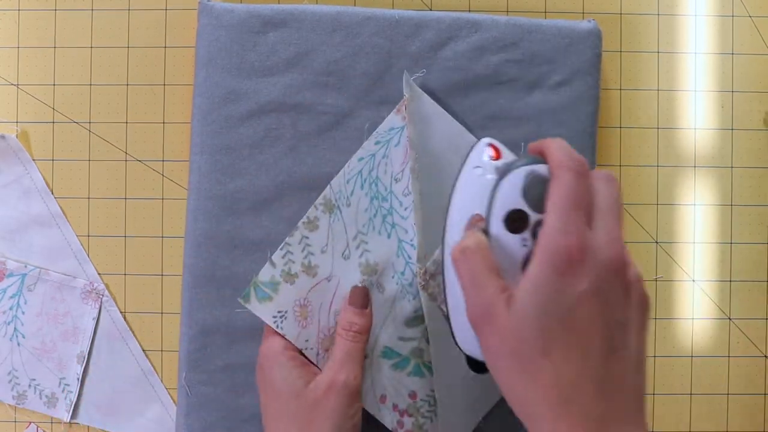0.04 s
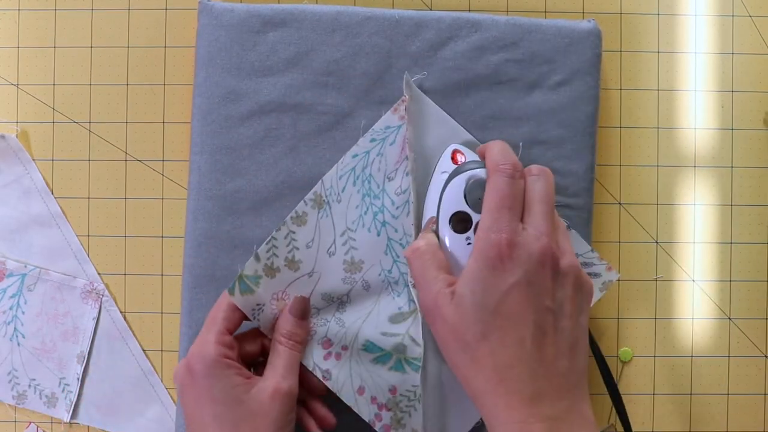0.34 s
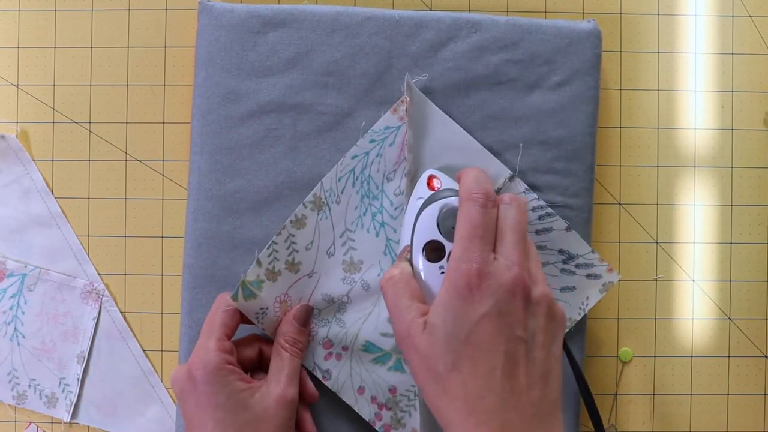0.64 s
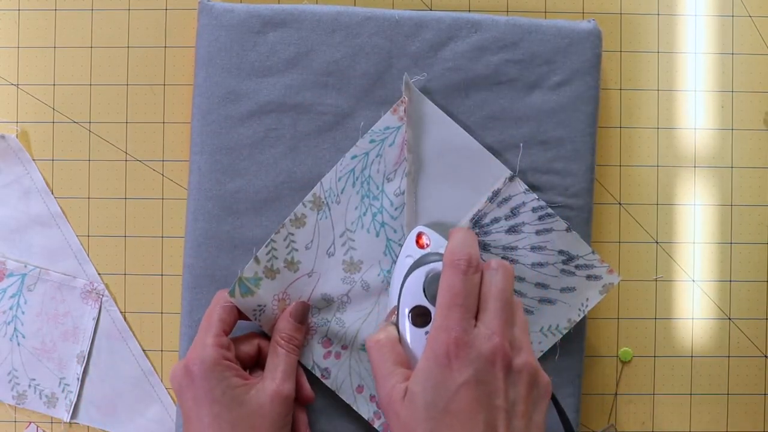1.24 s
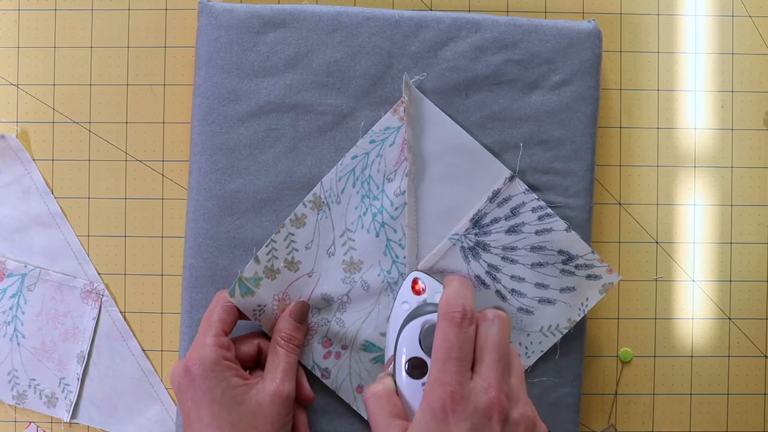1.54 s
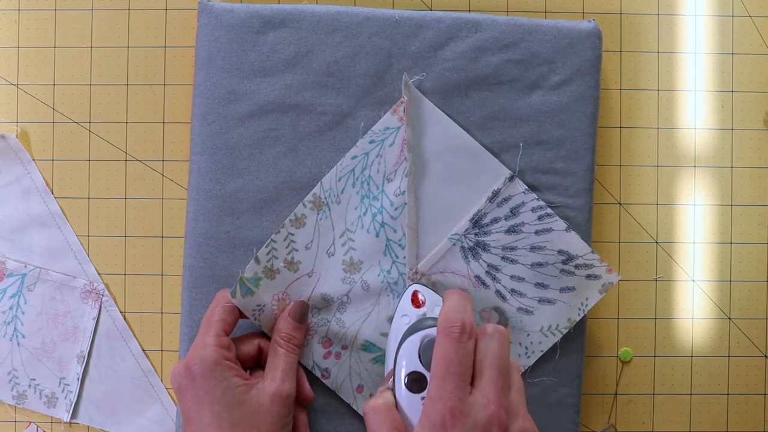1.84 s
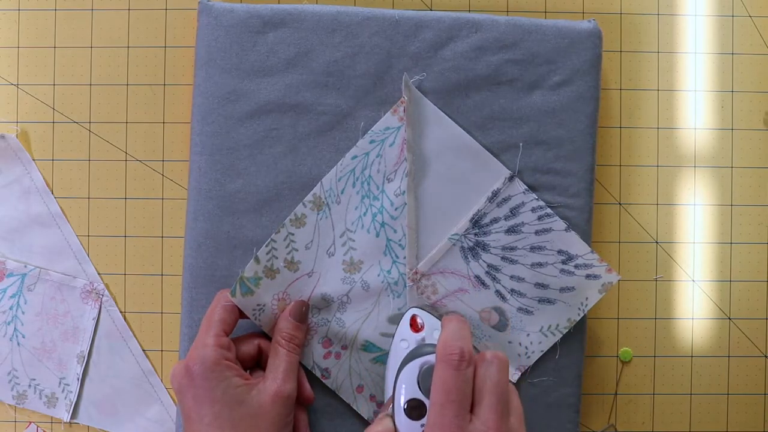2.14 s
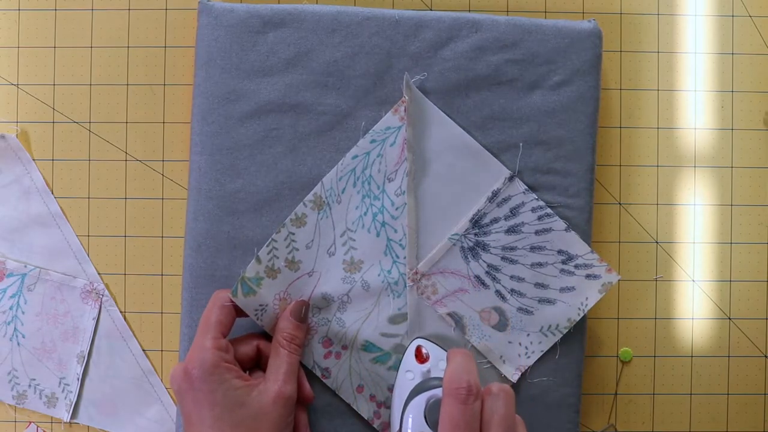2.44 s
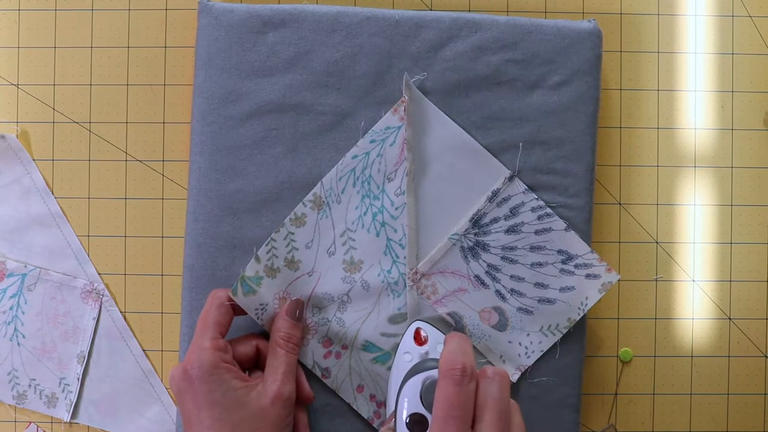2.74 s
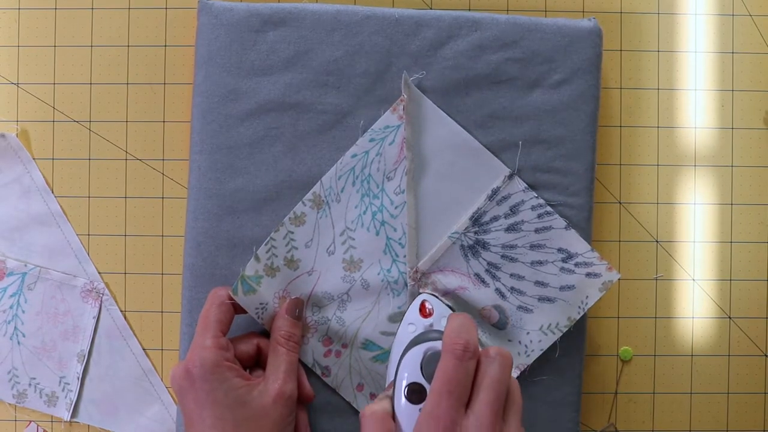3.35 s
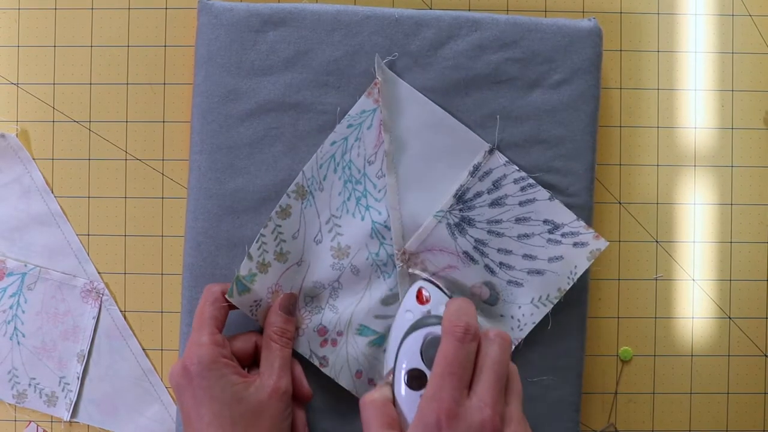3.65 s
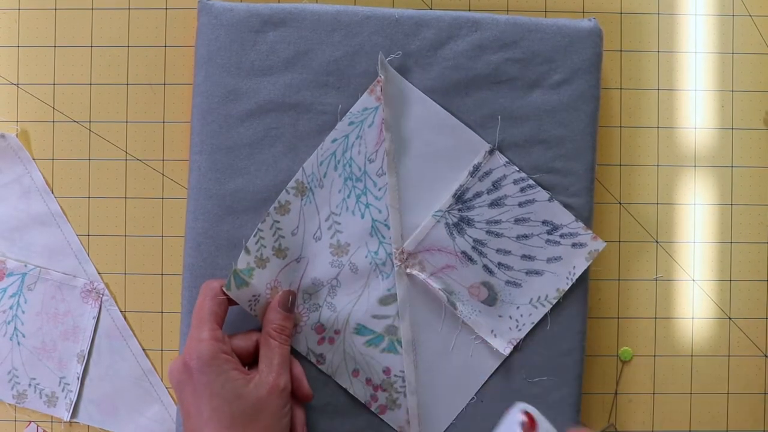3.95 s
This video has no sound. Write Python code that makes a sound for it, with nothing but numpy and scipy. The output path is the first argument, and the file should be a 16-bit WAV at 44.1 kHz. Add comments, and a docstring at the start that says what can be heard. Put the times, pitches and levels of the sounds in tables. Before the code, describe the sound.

A small iron swishes over cotton, close up in a quiet room, starting with a light scrape and a soft table bump. It judders with a low thrum around 1.3 seconds, and the thermostat clicks at 1.6. Fainter strokes follow, with a hollow knock at 2.5. At 3.4 the iron knocks down and sweeps across the cloth, then ticks, judders and knocks again just before 4 seconds.

```python
"""Ironing in a small room

Close on a padded board, a stereo pair of microphones, quiet air behind. A small iron glides to and fro
over cotton: its sole swishes on the weave, and where it catches and judders the board and the hollow
iron thrum. The thermostat clicks once, a little to the right. Near the end the iron knocks down,
sweeps across the seam and is dragged off."""
import sys
import numpy as np
from scipy import signal
from scipy.fft import rfft, irfft, next_fast_len
from scipy.io import wavfile
from scipy.ndimage import uniform_filter1d, map_coordinates

SR = 44100
rng = np.random.default_rng(int(sys.argv[2]) if len(sys.argv) > 2 else 0)


def pcm_store(signal):
    """Save signal as 16-bit PCM."""
    levels = np.round(np.clip(np.atleast_2d(signal), -1, 1) * 32767)
    wavfile.write(sys.argv[1], SR, levels.astype(np.int16).T)


N = 176400

# decay of the small room: f/Hz, t60/s
ROOM_DECAY = [(150, 0.41), (1000, 0.33), (4000, 0.26), (12000, 0.31)]
BOARD_WET_DB, SHELL_WET_DB, METAL_WET_DB, SNAP_WET_DB = -19, -1, 1.5, -13
# spectrum of the room's air: f/Hz, level/dB
AIR_SPECTRUM = [(25, -11), (60, -6.5), (110, -10), (250, -3.5), (400, -6), (700, -12.5), (1050, -11.5),
                (2000, -15), (3200, -15), (6000, -19.5), (10000, -23.5), (15800, -31)]
AIR_DB, HUM_DB, HUM_HZ, HUM_WIDTH_HZ = -54, -60, 146.6, 34
# how alike air, rubbing cloth and sole plate arrive at the two microphones: f/Hz, correlation
AIR_ALIKE = [(50, 0.18), (160, 0.78), (500, 0.27), (1500, 0.065), (8000, 0.033)]
RUB_ALIKE = [(500, 0.32), (2500, 0.75), (5000, 0.47), (12000, 0.22)]
PLATE_ALIKE = [(500, 0.85), (2500, 0.11)]
# balance of the microphones: f/Hz, left minus right/dB
MIC_BALANCE = [(100, 0.5), (300, 1.6), (1200, 1.5), (2700, -2), (5000, 0.5), (12000, -.3)]
TOP_HZ = 15800

# hand on the table, thermostat and its bounces, grip on the housing, sole landing: t/s, level/dB
BUMPS = [(.233, -37.5), (.268, -50)]
SNAPS = [(1.6349, -27.5), (1.6367, -31), (1.6412, -31.5), (1.6467, -32.5)]
TICKS = [(.4735, -40), (3.6612, -28)]
LANDINGS = [(3.3945, -37.5)]
# the modes that each of these rings: f/Hz, level/dB, t60/s
TABLE_MODES = [(45, -11, 0.99), (92, -2, 0.12), (134, -1, 0.34), (158, 7, 0.074)]
SPRING_MODES = [(758, -22, 0.13), (1377, -10.5, 0.023), (1605, -19, 0.033), (2300, -10.5, 0.03),
                (2810, -2, 0.021), (2980, -5, 0.015), (3387, -2.5, 0.038), (3550, -7.5, 0.056),
                (4460, -21, 0.035), (6360, -21.5, 0.034)]
HOUSING_MODES = [(1090, -7, 0.029), (1400, -12.5, 0.028), (1850, -1.5, 0.0089), (2590, -9, 0.012),
                 (3330, -3, 0.0073), (3720, -6, 0.0085), (6200, -13, 0.0058), (8100, -17, 0.0078)]
SOLE_MODES = [(1439, -2.5, 0.092), (2140, -1.5, 0.053), (2280, 3, 0.034), (5270, -17, .04),
              (7940, -6, 0.035), (989, -3, .24), (1023, 1, .27), ]
SOFT_ATTACK_S, HARD_ATTACK_S = 0.0026, 0.00036

# resonances of the board and of the iron's hollow shell, sole plate and rim: f/Hz, width/Hz, level/dB
BOARD_PEAKS = [(138.5, 8, -1), (159.4, 15.4, 2.5), (181.6, 4, -1), (216, 13, -1), (263, 11, 10),
               (310, 18, -1), (377, 30, -11), (460, 31, -7.5), (586, 24, -16)]
SHELL_PEAKS = [(560, 520, -3), (731, 37, 5.5), (799, 54, 5.5), (909, 42, 10), (942, 40, 8),
               (1183, 340, 0.5), (1410, 42, 2), (1480, 40, 2.5), (1886, 300, -4.5), (2250, 210, -7.5)]
PLATE_PEAKS = [(459, 14, -1), (753, 20, -4), (850, 8.9, 3), (967, 58, 0), (1316, 130, -6.5),
               (1770, 140, -5.5), (2026, 88, -5.5), (2480, 960, -13)]
RIM_PEAKS = [(5240, 260, -2), (7900, 160, 10), (8800, 230, 6), (11000, 200, -18)]
# the iron knocks: t/s, board level/dB, shell level/dB, crack level/dB
KNOCKS = [(2.4859, -29, -31, -51), (3.393, -65, -58, -37.5), (3.3945, -28, -29, -31),
          (3.554, -49, -33.5, -39), (3.8303, -25.5, -36, -66), (3.8503, -31, -30.5, -42),
          (3.916, -38.5, -46, -51)]
# spectrum of the plastic crack: f/Hz, level/dB
CRACK_SPECTRUM = [(300, -30.5), (1200, -25), (2100, 14.5), (3300, 2), (5000, -2), (7600, -0.5), (11000, -9),
                  (16000, -23)]
CRACK_T60_S = 0.013

# threads snag under the sole: t/s, rise/s, fall/s, level/dB, f/Hz
SNAGS = [(.055, 0.012, 0.053, -52, 4120), (.28, 0.013, .012, -51, 3220)]
THREADS_PER_S, THREAD_WIDTH_HZ = 450, 770
# the sole scrapes as it first slides; the tipped iron skids on its rim:
# t/s, rise/s, hold/s, fall/s, level/dB
SCRAPES = [(-.05, 0.043, 0.1, 0.17, -44), (0.123, 0.11, 0.082, 0.24, -52),
           (0.466, 0.0077, 0.005, 0.016, -51.5)]
SKIDS = [(3.842, 0.012, .004, .014, -58), (3.888, 0.0078, 0.012, .012, -52.5)]
# the sole catches: t/s, rise/s, hold/s, fall/s, level/dB, rattle over thrum/dB, tilt/(dB per octave)
JUDDERS = [(1.292, 0.084, 0.0069, 0.051, -39, -11.5, 0), (1.381, 0.031, 0.01, 0.12, -52.5, -3, 8),
           (1.628, 0.092, 0.019, 0.05, -53, -9.5, 5), (1.986, 0.012, .005, 0.082, -48.5, -10, 2),
           (2.287, 0.056, .01, 0.075, -57.5, -2, -2), (2.414, 0.044, 0.028, 0.031, -45.5, -11, 2),
           (2.47, 0.029, 0.0086, 0.068, -40, -11, -4), (2.526, 0.047, .02, 0.068, -56.5, -7, -2),
           (3.386, 0.018, 0.038, 0.082, -42, -7, 5), (3.473, 0.018, 0.083, 0.051, -47.5, -6.5, 1.5),
           (3.661, 0.0025, 0.0098, 0.11, -56.5, 3.5, -4), (3.784, 0.068, 0.011, 0.028, -37.5, -5.5, 5),
           (3.877, 0.017, 0.016, 0.04, -38, -7, -1), (3.928, 0.015, 0.011, 0.047, -60.5, 8, 3)]
SLIPS_PER_S, SLIP_NOISE_DB = 330, -3

# strokes over the cotton: t/s, rise/s, hold/s, fall/s, level/dB, sag/(dB per s), tilt/(dB per octave),
# sole resonance over swish/dB, sole resonance f/Hz
STROKES = [(-.1, 0.07, 0.06, 0.35, -45.5, 37, -2.8, -9, 2310),
           (0.164, 0.071, 0.061, 0.027, -53, 15.5, 1, -7, 2850),
           (0.31, 0.019, 0.048, 0.04, -55, -4, 4, -2.5, 2760),
           (0.435, 0.065, 0.046, 0.14, -51, 2, 1.5, -7.5, 3000),
           (0.455, 0.089, 0.21, 0.13, -52, 9, 0.4, -2.5, 2500),
           (0.84, 0.27, .24, 0.48, -52, -2, 0, -7, 2420),
           (1.403, 0.15, 0.2, 0.14, -57.5, 8, -3, -2.5, 3000),
           (1.933, 0.12, 0.4, 0.21, -56.5, 0, 0, 0, 3170),
           (2.583, 0.096, 0.065, 0.047, -55, -9, 2, -3.5, 2820),
           (2.812, 0.049, 0.047, 0.032, -55.5, 0, 0.5, -2, 3200),
           (2.952, 0.092, 0.25, 0.15, -54.5, 16, 0.5, -3.5, 3220),
           (3.388, 0.014, 0.056, 0.093, -54.5, 4, 5, 1, 3180),
           (3.431, 0.087, 0.039, 0.088, -43, -8, 1, -4, 3060),
           (3.622, 0.035, 0.023, 0.47, -52.5, 24, 0.5, -18, 3200),
           (3.806, 0.044, 0.011, 0.03, -51, 0, 2.5, -6, 2980),
           (3.873, 0.015, 0.012, 0.062, -51.5, 0, 6, -7, 3180)]
# spectrum of the rubbed weave: f/Hz, level/dB
WEAVE_SPECTRUM = [(300, -28), (600, -7.5), (950, -9), (1250, -4.5), (1500, -9), (2000, -7), (3300, -6),
                  (4800, -8.5), (6200, -10), (7500, -12.5), (11000, -19), (15800, -29.5)]
FIBRES_PER_S, FIBRE_DB = 1200, -6.5
FLUTTER_PER_S, FLUTTER_DB = 55, 1
TILT_PIVOT_HZ, SOLE_WIDTH_HZ = 3500, 480


def amp(db):
    """Decibels to gain."""
    return 10 ** (np.asarray(db) / 20)


def unit(x):
    """Scale to rms 1."""
    return x / np.sqrt(np.mean(x ** 2) + 1e-20)


def steady(x, window_s=.04):
    """The same vibration held at a running rms of 1."""
    power = uniform_filter1d(x ** 2, size=round(window_s * SR))
    return x / np.sqrt(np.abs(power) + 1e-20)


def along(points, hz):
    """(f/Hz, value) points read on a log axis."""
    f, v = np.transpose(points)
    return np.interp(np.log(hz + 1), np.log(f + 1), v)


def wobble(rate):
    """A smooth random curve, rate knots a second."""
    knots = rng.standard_normal(int(N * rate / SR) + 4)
    return map_coordinates(knots, [np.arange(N) * rate / SR])


def impulses(rate):
    """Random impulses of either sign, on average rate a second."""
    return (rng.random(N) < rate / SR) * rng.choice([-1, 1], N)


def filtered(x, response):
    """x through a complex frequency response."""
    n = x.shape[-1]
    padded = next_fast_len(n + SR // 4)
    return irfft(rfft(x, padded) * response(np.fft.rfftfreq(padded, 1 / SR)), padded)[..., :n]


def resonate(x, peaks):
    """x through parallel (f/Hz, width/Hz, level/dB) resonances of alternating sign."""
    def response(f):
        return sum((-1) ** k * amp(db) * 1j * f * width / (hz * hz - f * f + 1j * f * width)
                   for k, (hz, width, db) in enumerate(peaks))
    return filtered(x, response)


def spread(pair, alike):
    """Two unrelated signals mixed to left and right with the given correlation."""
    turn = lambda hz: np.arccos(np.clip(along(alike, hz), -1, 1)) / 2
    mid, side = filtered(pair, lambda hz: np.array([np.cos(turn(hz)), np.sin(turn(hz))]))
    return np.array([mid + side, mid - side])


def noise(alike):
    """White stereo noise with the given correlation."""
    return spread(rng.standard_normal((2, N)), alike)


def swell(start, rise, hold, fall):
    """A rounded rise, hold and fall."""
    corners = start + np.cumsum(np.abs([0, rise, hold, fall]))
    ramp = np.interp(np.arange(N) / SR, corners, [0, 1, 1, 0])
    return np.sin(ramp * np.pi / 2) ** 2


def since(start):
    """Seconds since start, zero before."""
    return np.maximum(np.arange(N) / SR - start, 0)


def struck(hits, modes, attack):
    """Each hit rings the decaying modes in a slightly different mix."""
    out, t = np.zeros(N + SR), np.arange(SR // 2) / SR
    for start, db in hits:
        ring = sum(amp(level + rng.normal(0, 1) - 60 * t / t60) * np.sin(2 * np.pi * hz * t)
                   for hz, level, t60 in modes)
        out[round(start * SR):][:len(t)] += amp(db) * ring * (1 - np.exp(-t / attack))
    return out[:N]


def in_room(x, wet_db):
    """A close mono sound plus the room's short answer at each microphone."""
    hz, t, spectra = signal.stft(rng.standard_normal((2, SR // 3)), SR, nperseg=256)
    decay = amp(-60 * t / along(ROOM_DECAY, hz)[:, None])
    tail = signal.istft(spectra * decay, SR, nperseg=256)[1]
    tail = np.pad(tail / np.linalg.norm(tail[0]), ((0, 0), (SR // 250, 0)))  # arrives 4 ms late
    return x + amp(wet_db) * signal.fftconvolve(x[None], tail, axes=1)[:, :N]


def room_tone():
    """Steady air all around the microphones, with a low drone."""
    air = filtered(noise(AIR_ALIKE), lambda hz: amp(along(AIR_SPECTRUM, hz)))
    hum = resonate(noise(AIR_ALIKE), [(HUM_HZ, HUM_WIDTH_HZ, 0)])
    return amp(AIR_DB) * unit(air) + amp(HUM_DB) * unit(hum)


def table_bump():
    """The hand bumps the table and stirs its low modes."""
    return in_room(struck(BUMPS, TABLE_MODES, SOFT_ATTACK_S), BOARD_WET_DB)


def housing_ticks():
    """The plastic housing ticks under the grip."""
    return in_room(struck(TICKS, HOUSING_MODES, HARD_ATTACK_S), SHELL_WET_DB)


def thermostat():
    """The thermostat's spring snaps and bounces, a little right of centre."""
    click = in_room(struck(SNAPS, SPRING_MODES, HARD_ATTACK_S), SNAP_WET_DB)
    return click * amp([[-1], [1]])


def sole_landing():
    """The metal of the sole rings as it lands."""
    return in_room(struck(LANDINGS, SOLE_MODES, HARD_ATTACK_S), METAL_WET_DB)


def knocking():
    """Each blow rings board and shell, with a short plastic crack."""
    from_board, from_iron = np.zeros(N), np.zeros(N)
    crack = unit(filtered(rng.standard_normal(N), lambda hz: amp(along(CRACK_SPECTRUM, hz))))
    blow = signal.unit_impulse(SR // 2)
    board, shell = resonate(blow, BOARD_PEAKS), resonate(blow, SHELL_PEAKS)
    for start, board_db, shell_db, crack_db in KNOCKS:
        place = lambda ring: np.pad(ring / np.abs(ring).max(), (round(start * SR), N))[:N]
        t = since(start)
        crack_gain = amp(crack_db - 60 * t / CRACK_T60_S) * (t > 0)
        from_board += amp(board_db) * place(board)
        from_iron += amp(shell_db) * place(shell) + crack_gain * crack
    return in_room(from_board, BOARD_WET_DB) + in_room(from_iron, SHELL_WET_DB)


def snagging():
    """Threads catch on the sole and flick free in a short scratchy run."""
    out = np.zeros(N)
    for start, rise, fall, db, hz in SNAGS:
        scratch = resonate(impulses(THREADS_PER_S), [(hz, THREAD_WIDTH_HZ, 0)])
        out += amp(db) * swell(start, rise, 0, fall) * unit(scratch)
    return in_room(out, SHELL_WET_DB)


def scraping():
    """Friction rings the modes of the sole plate, and the high ones of its rim when it skids."""
    drag = lambda rows: sum(amp(db) * swell(*timing) for *timing, db in rows)
    plate = unit(resonate(noise(PLATE_ALIKE), PLATE_PEAKS))
    rim = unit(resonate(noise(PLATE_ALIKE), RIM_PEAKS))
    return drag(SCRAPES) * plate + drag(SKIDS) * rim


def juddering():
    """Irregular slips shake board and shell; where the sole bears down sets the thrum's colour."""
    force = unit(impulses(SLIPS_PER_S)) + amp(SLIP_NOISE_DB) * rng.standard_normal(N)
    board = resonate(force, BOARD_PEAKS)
    octaves = lambda hz: np.log2(np.clip(hz, BOARD_PEAKS[0][0], BOARD_PEAKS[-1][0]))
    thrum, rattle_gain = np.zeros(N), np.zeros(N)
    for *timing, db, rattle_db, tilt in JUDDERS:
        gain = amp(db) * swell(*timing)
        thrum += gain * steady(filtered(board, lambda hz: amp(tilt * octaves(hz))))
        rattle_gain += gain * amp(rattle_db)
    rattle = rattle_gain * steady(resonate(force, SHELL_PEAKS))
    return in_room(thrum, BOARD_WET_DB) + in_room(rattle, SHELL_WET_DB)


def gliding():
    """Close and dry: countless fibres flick past the sole and ring it; a stroke sags as the hand slows."""
    out = np.zeros((2, N))
    octaves = lambda hz: np.log2((hz + 1) / TILT_PIVOT_HZ)
    for start, rise, hold, fall, db, sag, tilt, sole_db, sole_hz in STROKES:
        fibres = rng.standard_normal((2, N)) * (rng.random((2, N)) < FIBRES_PER_S / SR)
        friction = rng.standard_normal((2, N)) + amp(FIBRE_DB) * unit(fibres)
        gain = amp(db - sag * since(start + rise)) * swell(start, rise, hold, fall)
        moving = gain > 0
        rub = spread(friction[:, moving], RUB_ALIKE)
        swish = filtered(rub, lambda hz: amp(along(WEAVE_SPECTRUM, hz) + tilt * octaves(hz)))
        sole_drive = spread(rng.standard_normal((2, N))[:, moving], RUB_ALIKE)
        sole = resonate(sole_drive, [(sole_hz, SOLE_WIDTH_HZ, 0)])
        out[:, moving] += gain[moving] * (unit(swish) + amp(sole_db) * unit(sole))
    return out * amp(FLUTTER_DB * wobble(FLUTTER_PER_S))  # the level flickers slightly


def scene():
    """The ironing in front, the room tone behind."""
    impacts = thermostat() + knocking() + sole_landing() + table_bump() + housing_ticks()
    sliding = gliding() + scraping() + snagging() + juddering()
    return impacts + sliding + room_tone()


def record(dry):
    """The two microphones differ slightly in colour and keep nothing above the band limit."""
    sides = np.array([[.5], [-.5]])
    return filtered(dry, lambda hz: amp(sides * along(MIC_BALANCE, hz)) * (hz < TOP_HZ))


dry = scene()
out = record(dry)
pcm_store(out)
```